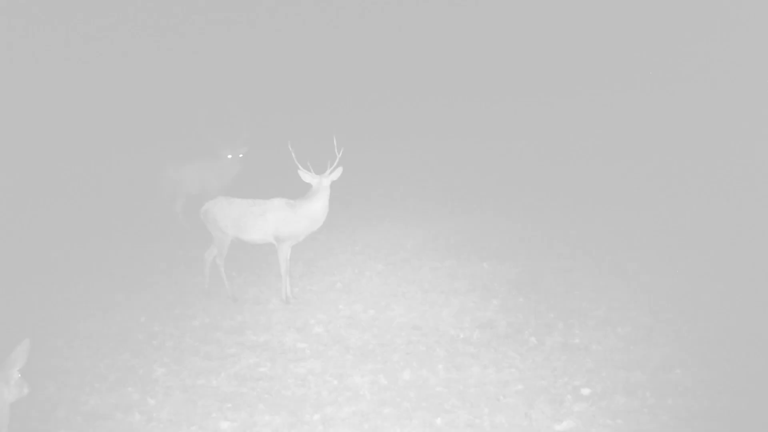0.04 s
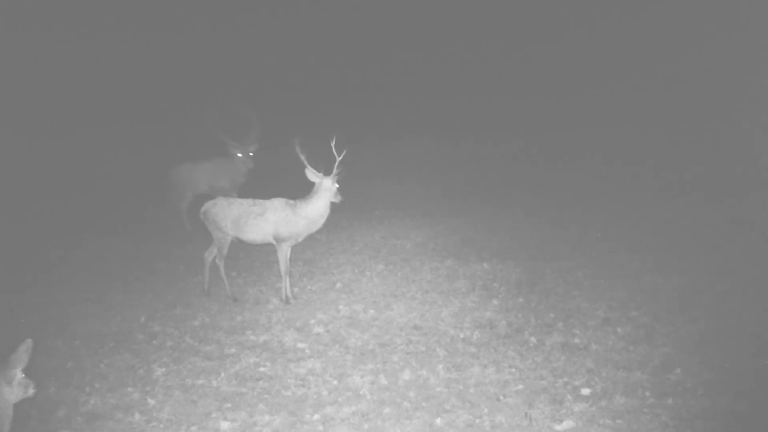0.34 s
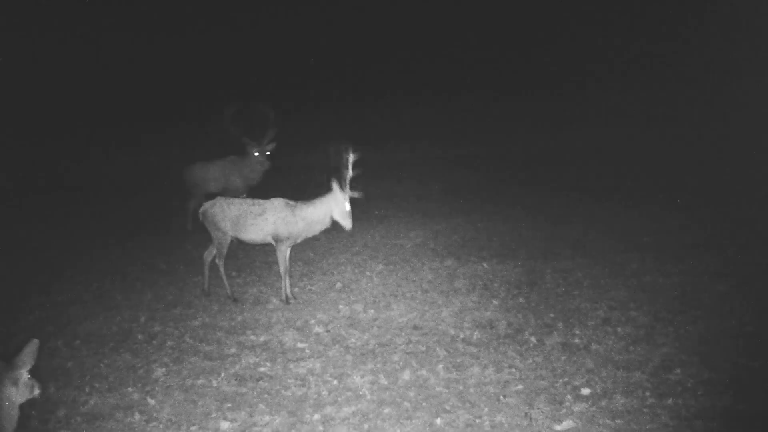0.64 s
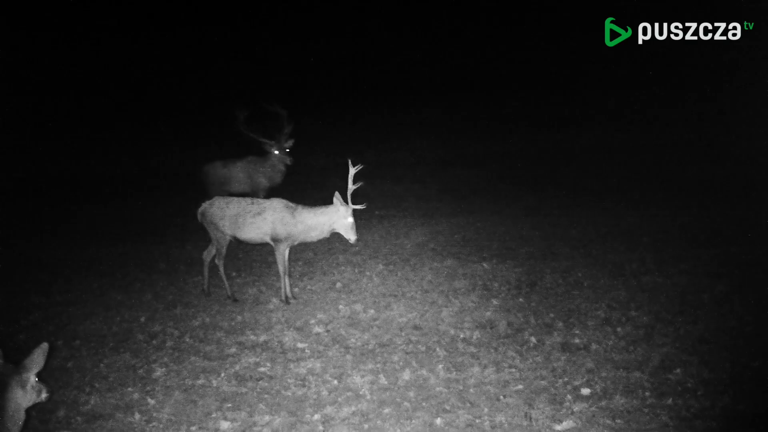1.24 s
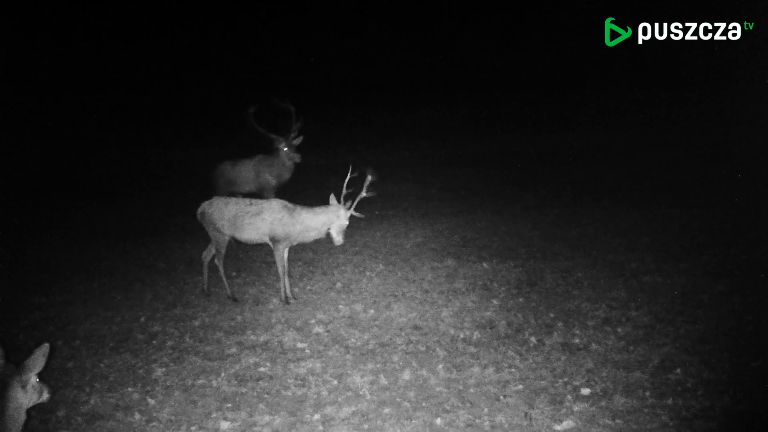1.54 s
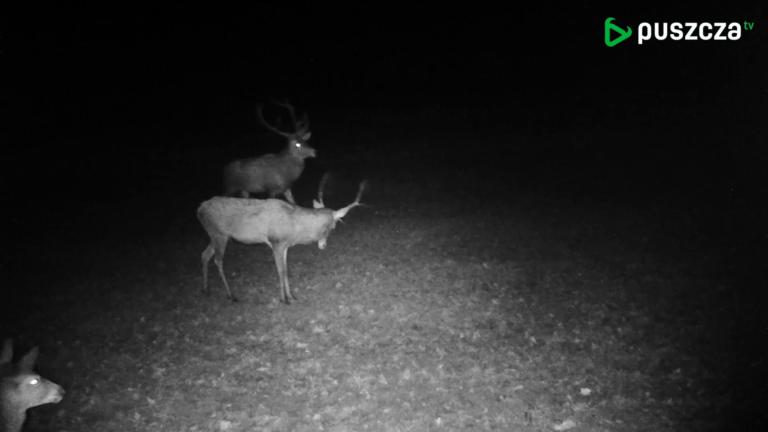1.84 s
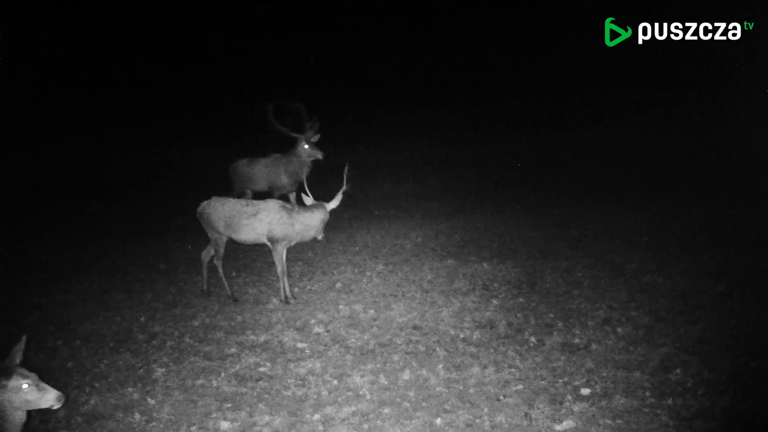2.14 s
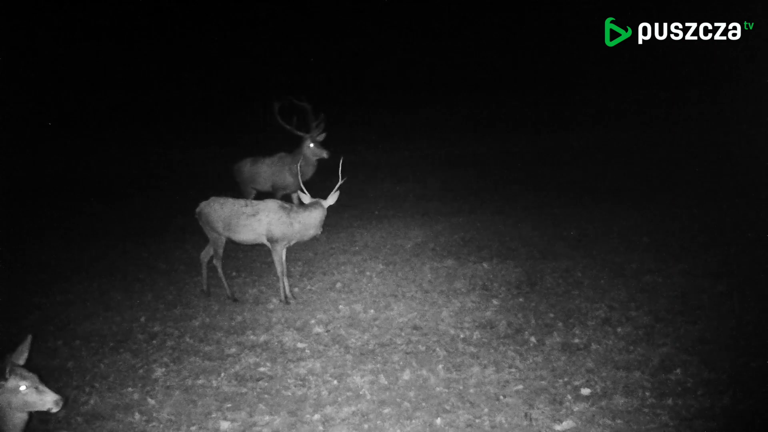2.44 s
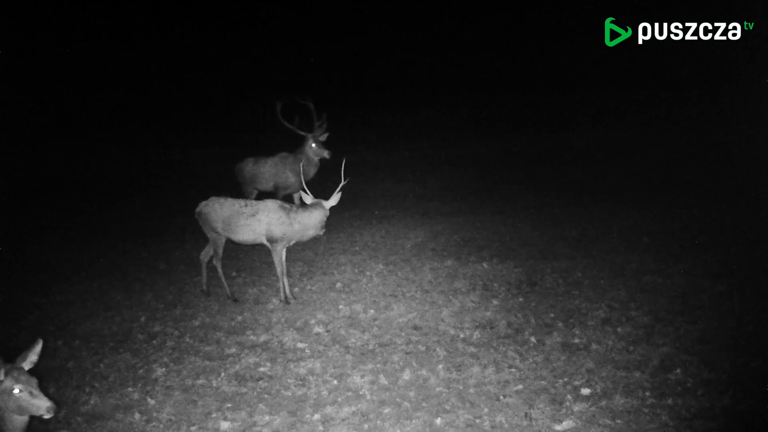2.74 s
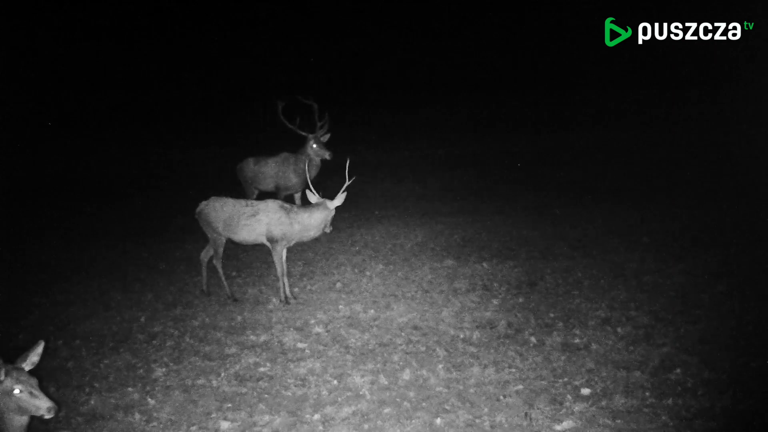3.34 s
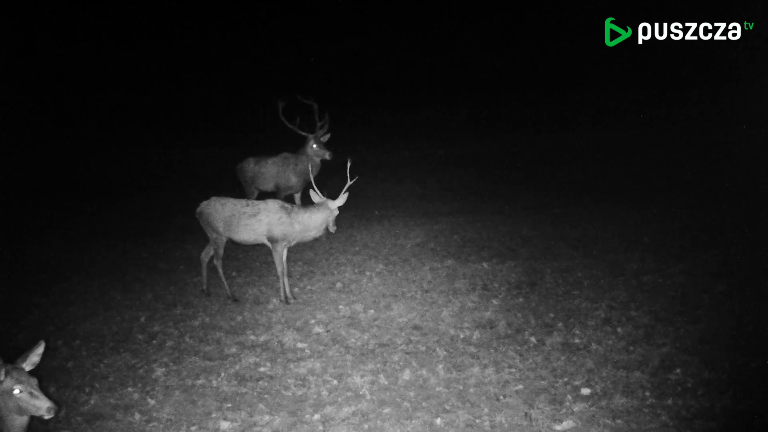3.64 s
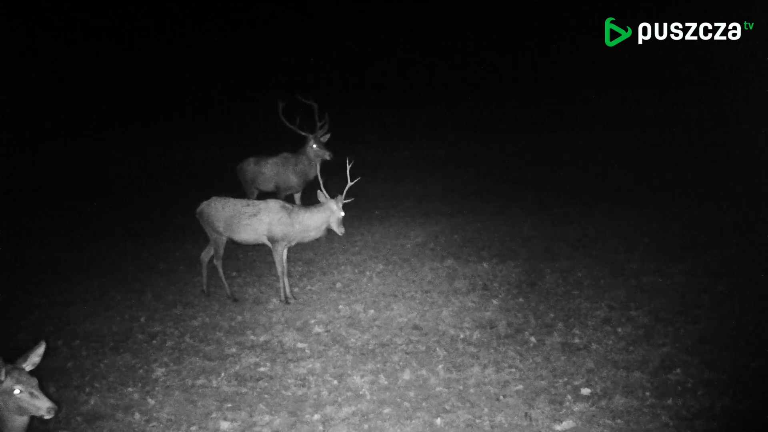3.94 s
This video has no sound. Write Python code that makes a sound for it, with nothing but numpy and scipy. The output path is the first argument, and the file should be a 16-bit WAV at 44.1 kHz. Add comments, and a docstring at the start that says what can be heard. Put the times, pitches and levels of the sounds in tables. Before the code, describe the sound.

Three faint, low electronic buzzes over steady hiss, with a few tiny dry clicks.

```python
"""Short, low, grunt-like buzzes, about one a second, each between two soft thumps: probably a trail
camera's own electronics loading their supply. The camera watches deer on open ground at night.
A few tiny dry clicks, like antler tips or twigs, come from the field.
The sound fades in on microphone hiss and low rumble."""
import sys
import numpy as np
from scipy import signal
from scipy.fft import rfft, irfft
from scipy.io import wavfile
from scipy.ndimage import uniform_filter1d

SR = 44100
rng = np.random.default_rng(int(sys.argv[2]) if len(sys.argv) > 2 else 0)


def log_audio(samples):
    """Write samples as a 16-bit WAV file to the path given in sys.argv[1]."""
    # one column per channel
    frames = np.atleast_2d(samples).T
    # limit to full scale, then quantise
    limited = np.clip(frames, -1, 1)
    pcm = np.round(limited * 32767).astype(np.int16)
    wavfile.write(sys.argv[1], SR, pcm)


N = 176400


def undb(db):
    """Decibels to gain."""
    return 10 ** (np.asarray(db) / 20)


def unit(x):
    """Scale to rms 1."""
    return x / np.sqrt(np.mean(x ** 2))


def band(x, hz, width_hz):
    """Two-pole resonance, gain 1 at the centre."""
    return signal.lfilter(*signal.iirpeak(hz, hz / width_hz, fs=SR), x)


def walk(rate_hz):
    """Smooth random wander, rms 1."""
    hold = int(SR / rate_hz)
    stairs = np.repeat(rng.standard_normal(N // hold + 1), hold)
    return unit(uniform_filter1d(uniform_filter1d(stairs, hold), hold)[:N])


def step(t, start_s, rise_s=0.0013, leak_s=0.012):
    """A voltage step that leaks away."""
    age = np.maximum(t - start_s, 0)
    return (1 - np.exp(-age / rise_s)) * np.exp(-age / leak_s)


# buzz harmonics (order, relative level [dB])
HARMONICS = [(1, -2.5), (2, 0.5), (3, -4.5), (4, -12), (5, -11.5), (6, -19), (7, -14), (8, -14.5), (9, -17),
             (10, -21), (11, -11), (12, -13.5), (13, -20), (14, -19.5), (18, -20), (21, -17), (22, -19.5),
             (23, -24.5), (24, -25.5)]
# buzz resonances (centre [Hz], width [Hz], relative level [dB])
RINGS = [(850, 250, -5.5), (1346, 300, 1.5), (2780, 430, -2), (4150, 270, -2), (5615, 81, -3),
         (7560, 400, -9.5), (9800, 430, -4.5)]
# buzz bursts (start [s], length [s], level [dB], rasp re stack [dB], added onset rasp re stack [dB])
BURSTS = [(1.093, 0.24, -54.5, -8.5, -7), (2.024, 0.15, -53, -11.5, -18), (3.019, 0.162, -52, -14, -13)]


def buzz(t, pitch_hz=64.36, jitter=0.0025, flutter_db=2, edge_s=0.0013, onset_decay_s=0.0089):
    """Bursts at one pitch: wavering harmonics, thin rings struck once a cycle, fizz and rasp."""
    cycles = np.cumsum(pitch_hz * (1 + jitter * walk(30))) / SR
    stack = np.zeros(N)
    for order, db in HARMONICS:
        gain = undb(db + flutter_db * walk(35))
        stack += gain * np.sin(2 * np.pi * (order * cycles + rng.random()))
    pulses = np.diff(np.floor(cycles), prepend=0) * undb(1.5 * walk(100))
    rings = np.zeros(N)
    for hz, width_hz, db in RINGS:
        strikes = np.roll(pulses, rng.integers(N))
        rings += undb(db) * unit(band(band(strikes, hz, width_hz), hz, width_hz))
    rasp = unit(band(rng.standard_normal(N), hz=400, width_hz=570))
    fizz = unit(band(rng.standard_normal(N), hz=8800, width_hz=3700))
    tone = unit(stack) + undb(-14) * unit(rings) + undb(-19) * fizz
    out = np.zeros(N)
    for start_s, length_s, db, rasp_db, onset_db in BURSTS:
        gate = np.clip(np.minimum(t - start_s, start_s + length_s - t) / edge_s + .5, 0, 1)
        onset = np.exp(-np.abs(t - start_s) / onset_decay_s)
        rasp_gain = undb(rasp_db) + undb(onset_db) * onset
        out += undb(db) * gate * (tone + rasp_gain * rasp)
    return out


# supply sags (sag time [s], recovery time [s], sag step [dB], recovery step [dB])
SUPPLY_SAGS = [(1.093, 1.333, -34, -34), (1.477, 1.512, -38.5, -37.5), (2.012, 2.173, -32.5, -34),
               (2.342, 2.371, -39, -40.5), (3.013, 3.182, -32.5, -36)]


def thumps(t):
    """The supply steps down as the load comes on and up as it ends."""
    return sum(undb(up_db) * step(t, up_s) - undb(down_db) * step(t, down_s)
               for down_s, up_s, down_db, up_db in SUPPLY_SAGS)


# dry clicks (time [s], level [dB], ring [Hz], decay [s], crack re ring [dB], knock re ring [dB])
FIELD_CLICKS = [(0.5023, -34.5, 9100, 0.0007, 1.5, -4), (.5450, -40, 4930, 0.00056, -3, -6),
                (0.677, -48, 10000, .0006, -3, -20), (0.7611, -43.5, 2750, 0.00088, -12, -6),
                (0.762, -46, 7400, 0.0013, -1, -15), (0.9649, -41, 8200, 0.00072, -1, -2),
                (1.186, -46, 2750, 0.00097, -14, -10), (1.3218, -30.5, 8500, 0.0004, 1.5, -8),
                (1.411, -48, 4730, 0.0012, -2, -12), (1.7515, -38.5, 8250, 0.00084, 1, 2),
                (1.7528, -40, 4550, 0.00091, 3, 4), (2.778, -40, 10800, 0.00086, 9, 4),
                (3.7350, -48, 9500, .0008, -3, -15)]


def clicks(t):
    """Each click: a brief ring, a bright crack and a woody knock, then a faint high rustle."""
    out = np.zeros(N)
    size = 3000
    age = t[:size]
    for start_s, db, hz, decay_s, crack_db, knock_db in FIELD_CLICKS:
        white = rng.standard_normal((3, size))
        fall = np.exp(-age / decay_s)
        ring = unit(fall * np.sin(2 * np.pi * hz * age))
        crack = unit(band(white[0] * fall, hz=9100, width_hz=4700))
        knock = unit(band(white[1] * fall, hz=3700, width_hz=3400))
        rustle = unit(band(white[2] * np.exp(-age / 0.017), hz=8700, width_hz=3500))
        click = unit(ring + undb(crack_db) * crack + undb(knock_db) * knock) + undb(-8) * rustle
        peak_scale = np.sqrt(decay_s * SR / size) / 2  # rms 1 to a peak near 1
        i = int(start_s * SR)
        out[i:i + size] += undb(db) * peak_scale * click
    return out


# noise floor spectrum (frequency [Hz], relative density [dB])
FLOOR_SPECTRUM = [(8, 3.5), (18, 2), (40, -1), (90, -6.5), (200, -12.5), (400, -17.5), (900, -23),
                  (2000, -27.5), (4500, -31), (9000, -32.5), (12500, -32.5), (14000, -36), (14800, -42)]


def hiss_and_rumble(rms_db=-50.5):
    """Steady microphone hiss over low rumble."""
    hz, db = np.array(FLOOR_SPECTRUM).T
    bins_hz = np.maximum(np.arange(N // 2 + 1) * SR / N, 1)
    shape = undb(np.interp(np.log(bins_hz), np.log(hz), db))
    return undb(rms_db) * unit(irfft(rfft(rng.standard_normal(N)) * shape, N))


def scene():
    """Everything at the microphone input, mono."""
    t = np.arange(N) / SR
    return (hiss_and_rumble() + buzz(t) + thumps(t) + clicks(t))[None]


def record(dry):
    """The input switches on with a tick, fades in while its bias settles, and loses its top."""
    fade_start_s, fade_s, bias_peak_s = 0.049, 0.66, 0.24
    rolloff_hz, cutoff_hz = 13900, 14550
    t = np.arange(N) / SR
    age = np.maximum(t - fade_start_s, 0)
    ramp = np.minimum(age / fade_s, 1) ** 1.03
    fade = np.hypot(ramp, undb(-23))
    tick = undb(-55.5) * step(t, start_s=0.028, rise_s=1 / SR)
    bias = -undb(-34.5) * age / bias_peak_s * np.exp(1 - age / bias_peak_s)  # one subsonic swing
    rolloff = signal.butter(6, rolloff_hz, fs=SR, output="sos")
    cutoff = signal.ellip(10, .1, 70, cutoff_hz, fs=SR, output="sos")
    return signal.sosfilt(cutoff, signal.sosfilt(rolloff, dry * fade + tick + bias))


dry = scene()
out = record(dry)
log_audio(out)
```